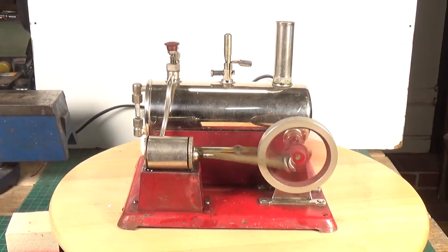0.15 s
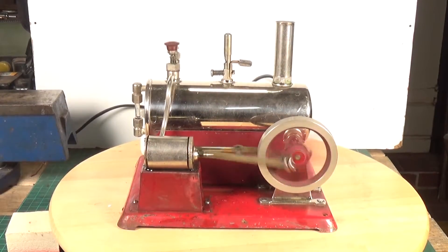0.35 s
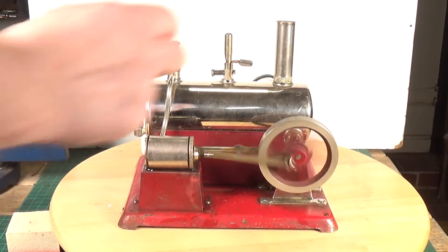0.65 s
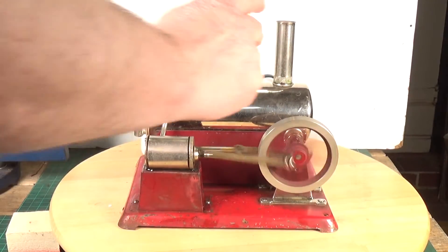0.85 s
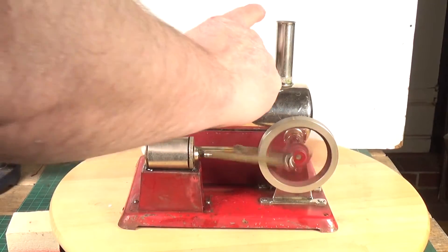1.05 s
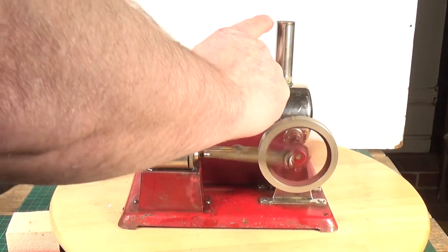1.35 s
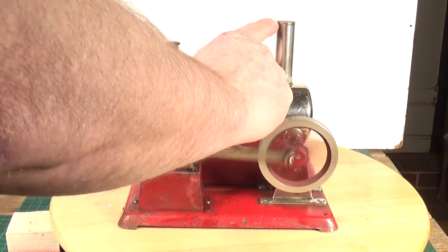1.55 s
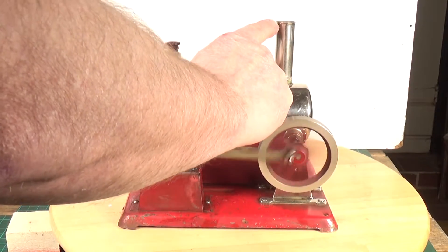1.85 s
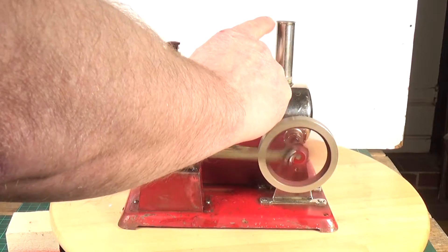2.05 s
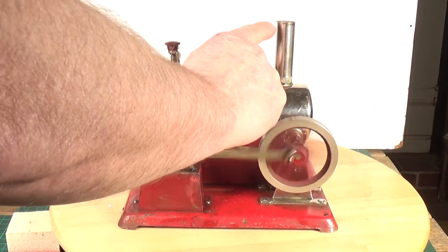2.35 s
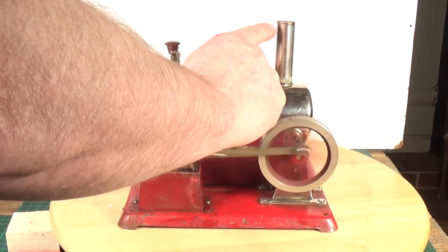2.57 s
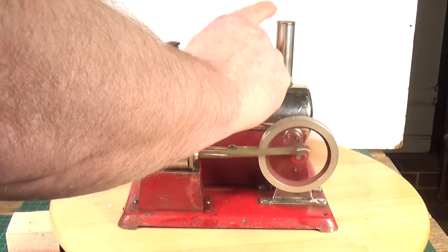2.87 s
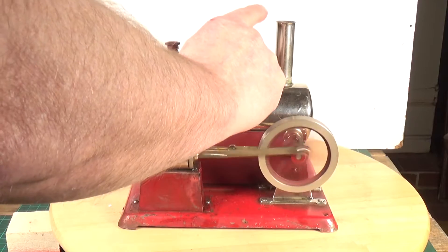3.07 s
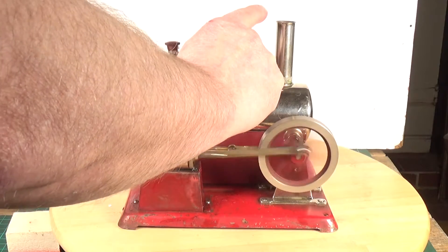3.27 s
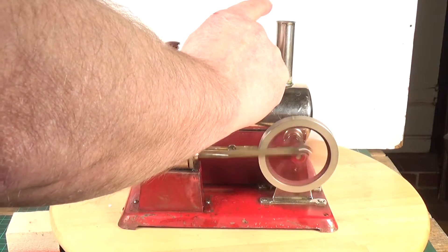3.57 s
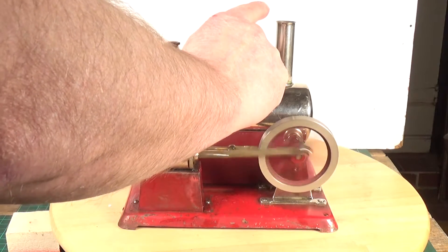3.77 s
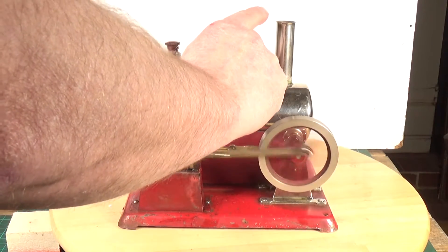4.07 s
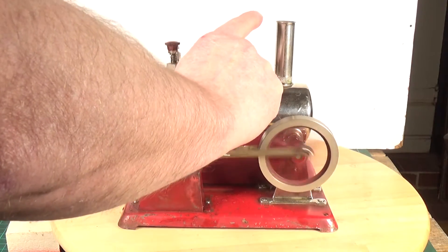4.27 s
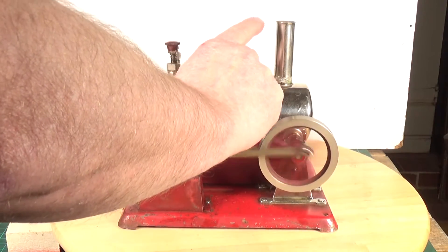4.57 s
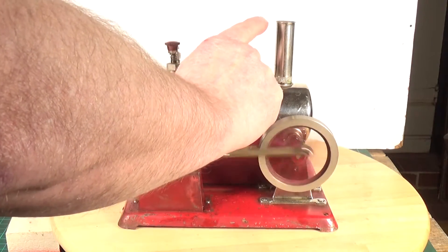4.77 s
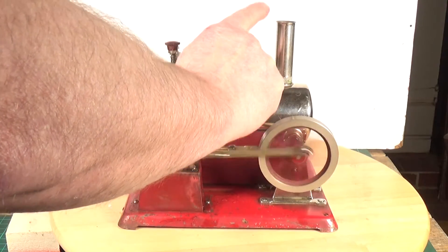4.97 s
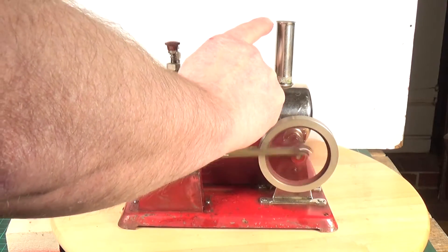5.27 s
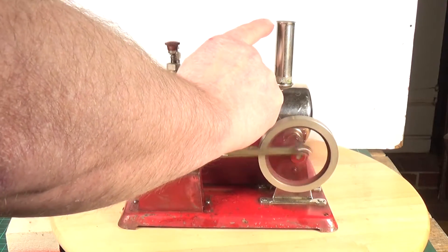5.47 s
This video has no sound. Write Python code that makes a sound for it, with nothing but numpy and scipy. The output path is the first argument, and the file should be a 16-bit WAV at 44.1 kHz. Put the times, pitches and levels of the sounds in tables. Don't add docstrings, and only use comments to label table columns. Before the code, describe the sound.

A small steam engine runs close to the microphone, about ten turns a second, each with a soft puff and two loose metal knocks. A shrill whistle sounds a long clear toot, then a weaker wavering one. After a stretch of engine alone comes a breathy hiss with no note, then a loud clear toot running to the end. Small room, faint air, short echo.

```python
import sys
import numpy as np
from scipy import signal
from scipy.fft import rfft, irfft
from scipy.io import wavfile
from scipy.ndimage import uniform_filter1d

SR = 44100
rng = np.random.default_rng(int(sys.argv[2]) if len(sys.argv) > 2 else 0)


def to_wav(sig):
    pcm = np.clip(np.atleast_2d(sig), -1, 1) * 32767
    pcm = np.round(pcm).astype(np.int16)
    wavfile.write(sys.argv[1], SR, pcm.T)


def voltage_ratio(level):
    return 10 ** (np.asarray(level, float) / 20)


N = 248277

# time in seconds, gain in dB.
GAIN = [
    (0, -1),
    (1.46, 1),
    (1.49, -4.5),
    (2.85, -4.5),
    (3.6, -3),
    (4.5, -0.5),
    (5.25, -0.5),
    (5.29, -2.5),
    (5.63, -4.5),
]


def unit(x):
    return x / np.sqrt(np.mean(x ** 2))


def curve(table, column=1):
    table = np.array(table, float)
    return np.interp(np.arange(N) / SR, table[:, 0], table[:, column])


def walk(hz):
    return unit(signal.lfilter(*signal.butter(2, hz, fs=SR), rng.standard_normal(N)))


def butter(x, order, hz, kind):
    return signal.sosfilt(signal.butter(order, hz, kind, fs=SR, output="sos"), x)


def ring(x, body):
    total = 0
    for k, (hz, width, db) in enumerate(body):
        total = total + (-1) ** k * voltage_ratio(db) * signal.lfilter(*signal.iirpeak(hz, hz / width, SR), x)
    return total


def arm(s):
    arm_s, sweep_s = 0.86, 0.2
    return np.clip((s - arm_s) / sweep_s + .5, 0, 1)


def air():
    # frequency in Hz, level in dB per Hz.
    air_colour = [(20, -39), (45, -6.5), (78, -31), (200, -24), (400, -8.5), (1300, -6), (2700, -22.5),
                  (6500, -19.5), (11000, -26), (15500, -31)]
    log_hz = np.log(np.fft.rfftfreq(N, 1 / SR) + 1)
    points = np.array(air_colour)
    gain = voltage_ratio(np.interp(log_hz, np.log(points[:, 0]), points[:, 1]))
    noise = unit(irfft(rfft(rng.standard_normal(N)) * gain, N))
    hidden_db = -2 * arm(np.arange(N) / SR)
    return voltage_ratio(-41 + curve(GAIN) + hidden_db + 0.27 * walk(30)) * noise


def room(x):
    # delay in seconds, level in dB.
    wall_echoes = [
        (.027, -25),
        (.058, -24),
        (.066, -22),
        (.076, -30),
        (.105, -30),
    ]
    t60_s, tail_db = .32, -18
    t = np.arange(SR // 2) / SR
    tail = rng.standard_normal(len(t)) * np.exp(-np.log(1000) * t / t60_s) * (t > .006)
    response = voltage_ratio(tail_db) * tail / np.linalg.norm(tail)
    for delay_s, db in wall_echoes:
        response[int(delay_s * SR)] += voltage_ratio(db)
    dull = signal.lfilter(*signal.butter(1, 7000, fs=SR), x)
    return signal.fftconvolve(dull, response)[:N]


def valve():
    # opens and shuts in seconds, jet level in dB, unsteadiness 0-1, overtones in dB.
    toots = np.array([
        (1.453, 2.094, -40, 0.26, 3.3),
        (2.359, 2.831, -42.5, 0.54, 1.5),
        (4.607, 4.999, -42, 0.96, 0),
        (5.258, 5.7, -39.5, 0.23, -3.5),
    ])
    # time in seconds, note level in dB, pitch in Hz. The third toot has no note.
    lever_note = [(1.452, -10, 3445), (1.485, -6.5, 3566), (1.72, -10, 3595), (1.92, -10, 3572),
                  (2.03, -9.5, 3568), (2.1, -10.5, 3562), (2.362, -21, 3384), (2.42, -16, 3404),
                  (2.52, -24.5, 3439), (2.62, -20.5, 3453), (2.83, -26.5, 3439), (2.9, -99, 3438),
                  (5.2, -99, 3560), (5.25, -6, 3565), (5.45, -6.5, 3563), (5.63, -9.5, 3543)]
    speak_db, speak_s, overtones_s = 16, .008, 0.045
    scoop_hz, scoop_s = 140.2, 0.015
    stop_db_per_s, stop_hz_per_s = 2197, 26000
    creep_db_per_s, burst_db, burst_s, cut_db_per_s = 800, 5, 0.12, 1400
    jet_db_per_hz = 0.1155
    swell_db, swell_s = 8, 0.084
    rebound_db, rebound_s, rebound_hold_s, rebound_db_per_s = -12, .027, .034, 520

    t = np.arange(N) / SR
    now = np.searchsorted((toots[1:, 0] + toots[:-1, 1]) / 2, t)
    opens, shuts, jet_db, unsteady, overtones_db = toots[now].T
    early, since, late = np.maximum(opens - t, 0), np.maximum(t - opens, 0), np.maximum(t - shuts, 0)
    level_line, pitch_line = curve(lever_note, 1), curve(lever_note, 2)
    held_db = np.interp(np.minimum(t, shuts), t, level_line)
    hz = np.interp(np.minimum(t, shuts), t, pitch_line)

    note_db = held_db - speak_db * np.exp(-since / speak_s)
    note_db = note_db - 6 * stop_db_per_s * early - stop_db_per_s * late
    weeps = held_db + rebound_db - 99 * (late == 0)
    weeps = weeps - stop_db_per_s * np.maximum(rebound_s - late, 0)
    weeps = weeps - rebound_db_per_s * np.maximum(late - rebound_s - rebound_hold_s, 0)
    pitch = hz - scoop_hz * np.exp(-since / scoop_s) - stop_hz_per_s * late * (note_db > weeps)
    note_db = np.maximum(note_db, weeps)

    sharp = hz - np.interp(shuts, t, hz)
    jet_db = jet_db + jet_db_per_hz * sharp * (unsteady < .9)
    jet_db = jet_db + burst_db * (1 - unsteady) * np.exp(-since / burst_s)
    jet_db = jet_db - creep_db_per_s * early - cut_db_per_s * late
    bell_db = -swell_db * (unsteady > .9) * np.exp(-since / swell_s)
    overtones_db = overtones_db - cut_db_per_s * late - speak_db * np.exp(-since / overtones_s)
    return note_db, pitch, jet_db, bell_db, np.clip(unsteady, 0, 1), overtones_db


def whistle():
    # multiple of the note, level in dB.
    overtones = [(2, -32.5), (3, -33.5), (4, -44)]
    # frequency in Hz, width in Hz, level in dB.
    mouth, bell_high, bell_low = [(2320, 1700, -3.5), (5260, 430, 8), (6800, 1150, -2), (9100, 1800, 0.5),
                                  (11120, 1540, 5.5), (13200, 2000, 0.5), (14750, 2000, -3)], [(3372, 47, 6), (3510, 39, 7.5), (3740, 200, 3),
                                                 (4120, 450, -3.5)], [(2470, 360, -2.4), (2820, 690, 1.2),
                                                               (3320, 270, 4.4)]
    # time in seconds, depth in dB, half length in ms.
    chokes = [(1.52, 2.5, 7), (1.577, 5, 4.7), (1.647, 5, 15), (1.771, 3.5, 3.7), (1.875, 5, 4.7),
              (1.932, 6.5, 14), (1.959, 5.5, 6.5), (1.978, 5, 4.5), (2.069, 7, 3.9), (2.44, 14.5, 9.7),
              (2.65, 5, 12), (5.295, 9, 3), (5.313, 6, 9.4), (5.424, 6, 8.8), (5.48, 10.5, 8.8),
              (5.51, 4, 9.1), (5.603, 7.5, 2.8)]
    note_db, pitch, jet_db, swell_db, unsteady, overtones_db = valve()
    phase = 2 * np.pi * np.cumsum(pitch + 6 * walk(60)) / SR
    size = np.sqrt(1 - unsteady ** 2) + unsteady * (walk(45) + .6j * walk(51)) * 1.1
    size /= (1 + np.abs(size) ** 4) ** 0.44
    note = 1.53 * np.real(size * np.exp(1j * phase))
    for multiple, db in overtones:
        waver = .7 + .2 * multiple / 2 * (walk(12 * multiple) + 1j * walk(25 * multiple))
        note += voltage_ratio(db + overtones_db) * np.real(waver * np.exp(1j * multiple * phase))
    t = np.arange(N) / SR
    choke_db = sum(db * np.exp(-((t - s) * 1000 / ms) ** 2) for s, db, ms in chokes)

    jet = voltage_ratio(jet_db + 1.7 * walk(12.0))
    hiss = unit(ring(rng.standard_normal(N), mouth))
    high = unit(ring(ring(rng.standard_normal(N), bell_high), [(3540, 2300, 0)]))
    low = unit(ring(ring(rng.standard_normal(N), bell_low), [(3100, 3300, 0)]))
    bell = voltage_ratio(3.05 + 5.4 * unsteady + swell_db) * high + voltage_ratio(-20 + 21.8 * unsteady) * low
    flutter = voltage_ratio(2.15 * unsteady * walk(8.5))
    return np.sqrt(2) * voltage_ratio(note_db - choke_db) * note + jet * (hiss + flutter * bell)


def turns():
    # level in dB, change behind the arm in dB, drift in dB per second, turn-to-turn scatter in dB.
    blows = [
        (-39, -0.5, -.5, 1.7),
        (-34, 1, -0.43, 0.35),
        (-28.5, -4.5, -0.29, 0.64),
        (-31, -.5, .5, 0.94),
        (-38.5, 1, -0.29, 0.2),
        (-42.5, 8.5, -.5, 1),
    ]
    first_turn_s, turn_s = -.0148, .09948
    slows_from_s, slowing_ms_per_s2 = 4.55, 13.5
    cover_s, cover_half_s, cover_db = 1.063, 0.12, -6
    s = first_turn_s + turn_s * np.arange(-1, N / SR / turn_s)
    s = s + slowing_ms_per_s2 / 1000 * np.maximum(s - slows_from_s, 0) ** 2
    db, hidden_db, drift, scatter_db = np.array(blows).T[:, :, None]
    chance = rng.standard_normal((len(s), len(blows))).T
    is_chimney = np.arange(len(blows)) == 2
    covered = np.outer(is_chimney, np.exp(-((s - cover_s) / cover_half_s) ** 4))
    gain_db = np.interp(s, *np.transpose(GAIN))
    return s, db + cover_db * covered + hidden_db * arm(s) + drift * s + scatter_db * chance + gain_db


def strikes(hits, play_ms, scatter_db):
    s, blows_db = turns()
    first, tail = np.zeros(SR + N), np.zeros(SR + N)
    for delay_ms, decay_ms, db, blow in hits:
        chance = rng.standard_normal((len(s), 2))
        at = SR + ((s + (delay_ms + play_ms * chance[:, 0]) / 1000) * SR).astype(int)
        inside, start = at < SR + N, np.zeros(SR + N)
        strength = voltage_ratio(db + blows_db[int(round(blow)) - 1] + scatter_db * chance[:, 1])
        start[at[inside]] = strength[inside]
        first += start
        tail += signal.lfilter([1], [1, -np.exp(-1000 / (decay_ms * SR))], start)
    return first[SR:], tail[SR:]


def rattle(spread_db):
    return unit(rng.standard_normal(N) * voltage_ratio(spread_db * rng.exponential(size=N)))


def part(hits, body, db, knock_db, play_ms, scatter_db, spread_db):
    contacts = rattle(spread_db)
    first, tail = strikes(hits, play_ms, scatter_db)
    return voltage_ratio(db) * ring(voltage_ratio(knock_db) * first + tail * contacts, body) / np.std(ring(contacts, body))


def thump(hits, body, db):
    push = strikes(hits, 0.34, 0.63)[1]
    return voltage_ratio(db) * ring(push * (1 + 0.32 * walk(860)), body)


def exhaust():
    # delay within the turn in ms, decay in ms, level in dB, number of the blow that drives it.
    puffs = [
        (0, 13.5, -5.5, 1),
        (3.07, 4.3, -4, 1),
        (25.7, 5.7, -5, 1),
        (58.6, 5.7, -8.5, 1),
        (10, 99, -20, 1),
    ]
    # frequency in Hz, width in Hz, level in dB.
    port = [(5840, 250, -7), (6520, 630, 8), (8260, 1800, 3), (9440, 630, 2), (10200, 370, -24),
            (10600, 330, 5.5), (12230, 920, -8), (12500, 280, -8), (14200, 2300, -22), (16500, 1600, -25),
            (10000, 3400, -11)]
    flow = uniform_filter1d(strikes(puffs, 1.0, 0.7)[1], size=90)
    spray = rattle(2.1)
    return flow * unit(sum(voltage_ratio(3.8 * walk(23.0)) * ring(spray, [mode]) for mode in port))


def engine():
    # delay within the turn in ms, decay in ms, level in dB, number of the blow that drives it.
    squeak_hits, metal_hits = [(12, 10.8, -1, 1), (20, 2.4, -23, 1)], [(0, 3, -1, 1), (24.5, 13.6, -5, 2),
                                                    (42.6, 18.5, -5.5, 2), (51.8, 10, -10, 4),
                                                    (74.3, 1.4, -10, 4)]
    frame_hits, chimney_hits, boiler_hits = [(25.38, 26, -1, 2), (32.95, 13.8, -2.5, 2),
                                             (44.76, 5, -5.5, 2), (56.14, 3.9, 1.5, 4), (62.32, 16, -4, 4),
                                             (74, 14.7, -11, 4), (98.5, 32, -18, 4)], [(24.64, 10, -9.5, 3), (45.4, 4, -12.5, 3),
                                                                 (54.13, 4.5, -1, 3), (58.5, 18, -5.5, 3),
                                                                 (64.64, 8.3, -9, 3), (79, 5.2, -17, 3)], [(26.23, 13, -0.5, 6),
                                                                                       (33.93, 3, -6, 6)]
    base_hits, table_hits = [(27.91, 4.9, -4.5, 5), (42.77, 9.1, -6.5, 5), (58.18, 4.4, -2.5, 5),
                             (71.84, 0.53, -2, 5)], [(33.4, 7, -5, 5), (58.2, 1.7, 0.5, 5), (80.8, 2.5, -14, 5),
                                                (89.3, 3.5, -10, 5)]
    # frequency in Hz, width in Hz, level in dB.
    squeak_body, metal_body = [(11130, 170, 14), (10700, 67, -29)], [(2865, 40, 20.5), (3090, 720, 11), (3480, 17, 26),
                                               (4100, 57, 16), (4490, 17.4, 29), (4920, 194, 17.4),
                                               (5774, 42, 18.6), (6350, 400, 3.8), (6160, 260, 14.4),
                                               (6820, 160, 2.5), (7310, 1600, 10.8), (5100, 4100, 5.9)]
    frame_body, chimney_body, boiler_body = [(432, 180, -10.5), (485, 53, -3.5), (572, 60, -2.5),
                                             (703, 16, -1.5), (787, 73, 2.5), (971.7, 18.5, 0.5),
                                             (1089, 59, 3), (1192, 18, 1), (1315, 77, 1),
                                             (1034, 1077, -3.5), (1796, 297, -4), (2083, 39, -4.5),
                                             (2418, 265, -7.5)], [(1530, 75, 5.5), (1640, 230, -5)], [(808, 22.4, 0)]
    base_body, table_body = [(231, 15, 1), (272, 15, -.5), (300, 24, -4.5)], [(63.3, 9.2, -15), (103, 13, 0.5), (126, 18, 1), (167, 23, 1)]

    squeak = part(squeak_hits, squeak_body, db=-5.5, knock_db=0, play_ms=2.5, scatter_db=4, spread_db=0.1)
    metal = part(metal_hits, metal_body, db=-2.34, knock_db=17.8, play_ms=0.72, scatter_db=2.13, spread_db=1.15)
    frame = part(frame_hits, frame_body, db=-2.1, knock_db=24.48, play_ms=0.38, scatter_db=0.43, spread_db=1.07)
    chimney = part(chimney_hits, chimney_body, db=0, knock_db=27.56, play_ms=0.27, scatter_db=1.0, spread_db=0.7)
    boiler = part(boiler_hits, boiler_body, db=1.8, knock_db=22.2, play_ms=0.38, scatter_db=0.45, spread_db=0.76)
    thin = butter(frame + chimney + boiler + metal, 4, 330, "high")
    base = butter(thump(base_hits, base_body, 28.9), 2, 190, "high")
    table = butter(thump(table_hits, table_body, 9.5), 2, (50, 200), "band")
    return voltage_ratio(5.5) * exhaust() + squeak + thin + base + table


def scene():
    machine, steam = engine(), whistle()
    echo = room(voltage_ratio(-7) * machine + steam)
    return (machine + steam + echo + air())[None]


def roll_off(x):
    return signal.sosfilt(signal.butter(12, 15730, fs=SR, output="sos"), x)


def record(dry):
    limit, top_hz = .62, 15720
    swell = uniform_filter1d(np.abs(dry), size=220) * np.pi / 2
    held = dry / (1 + (swell / limit) ** 6) ** (1 / 6)
    mix = signal.sosfilt(signal.ellip(10, .3, 70, top_hz, fs=SR, output="sos"), held)
    return roll_off(mix)


dry = scene()
out = record(dry)
to_wav(out)
```